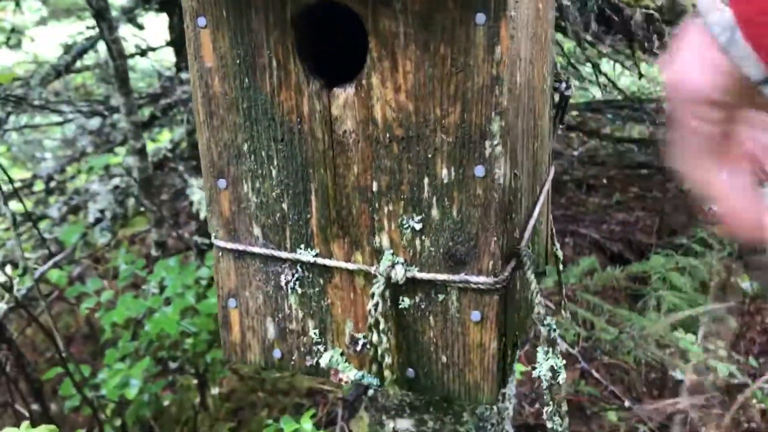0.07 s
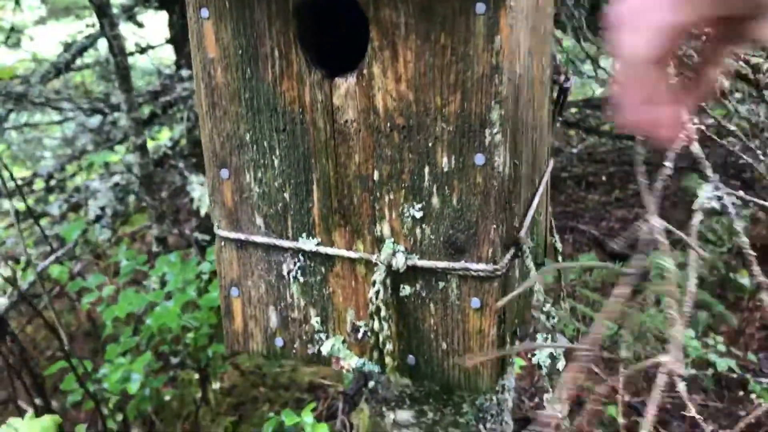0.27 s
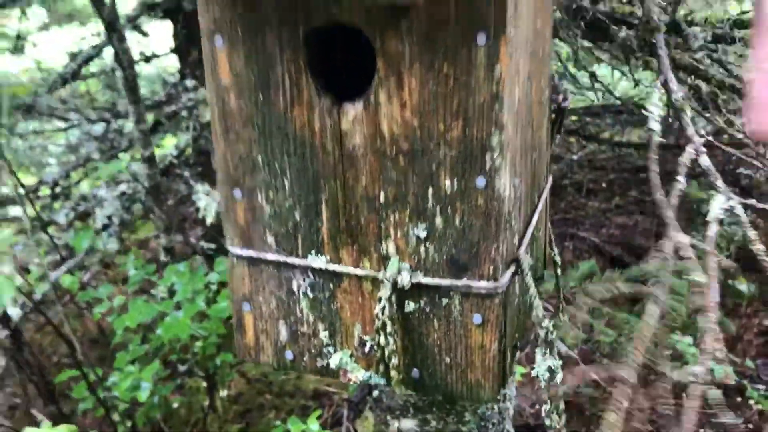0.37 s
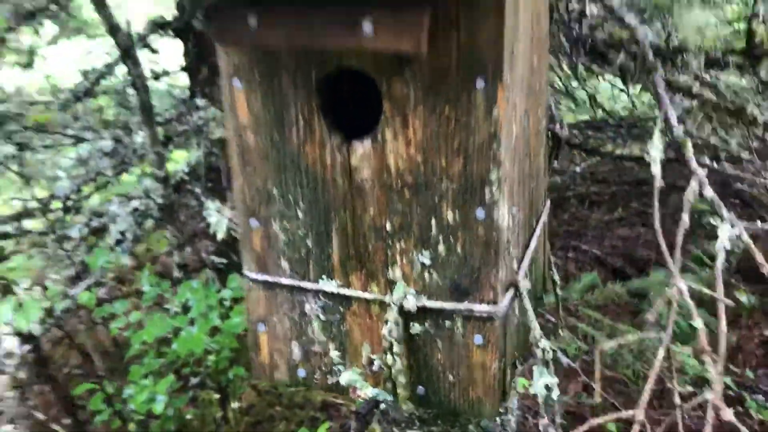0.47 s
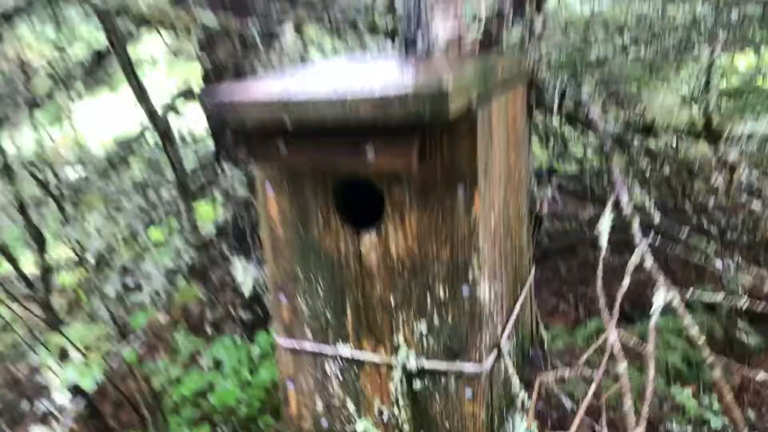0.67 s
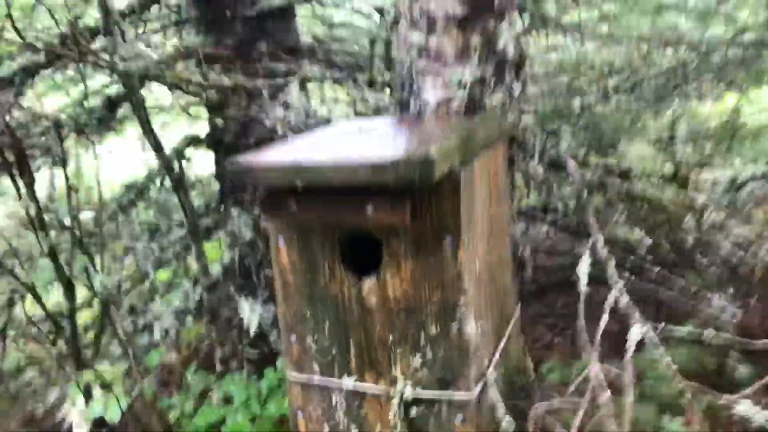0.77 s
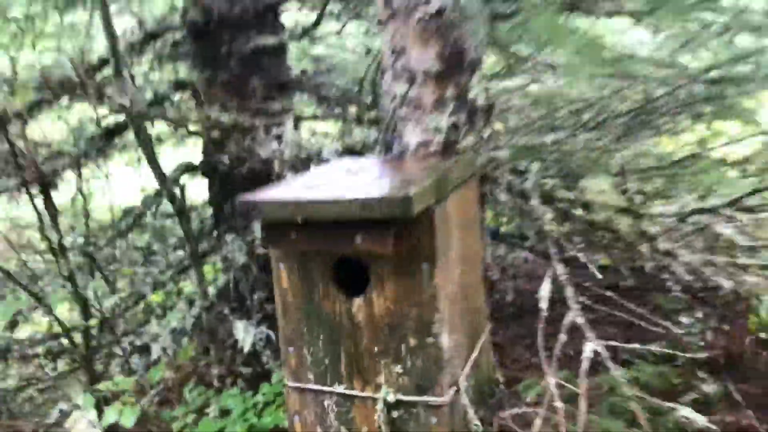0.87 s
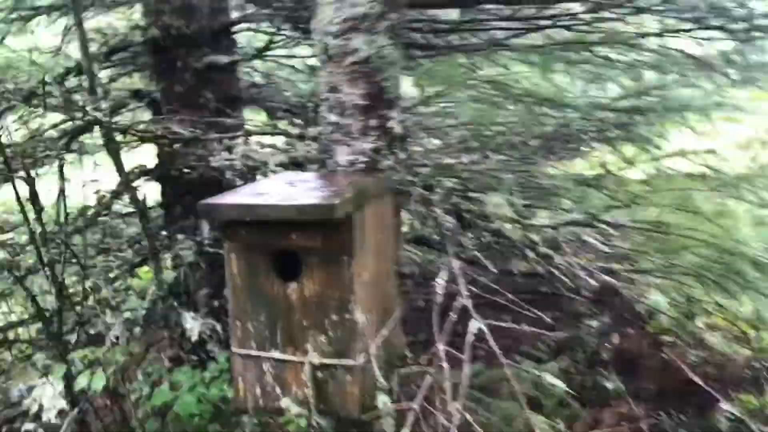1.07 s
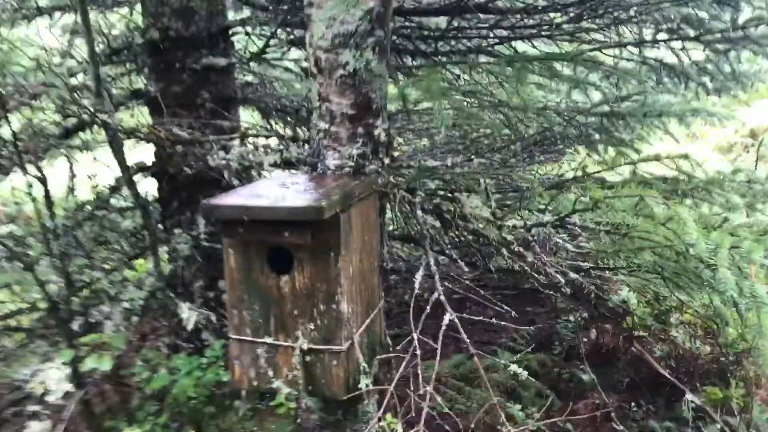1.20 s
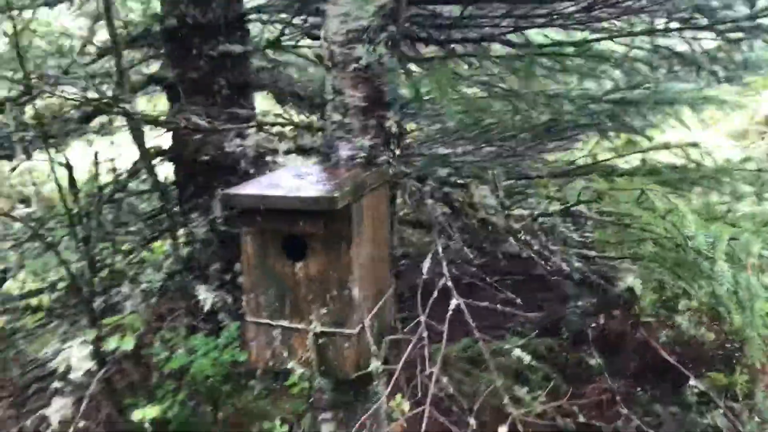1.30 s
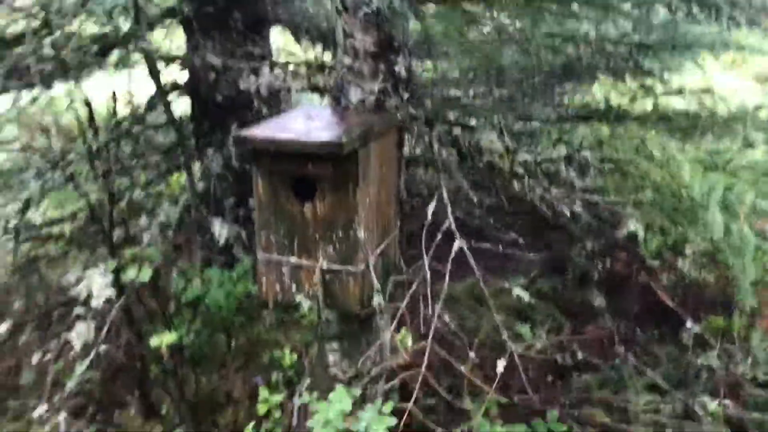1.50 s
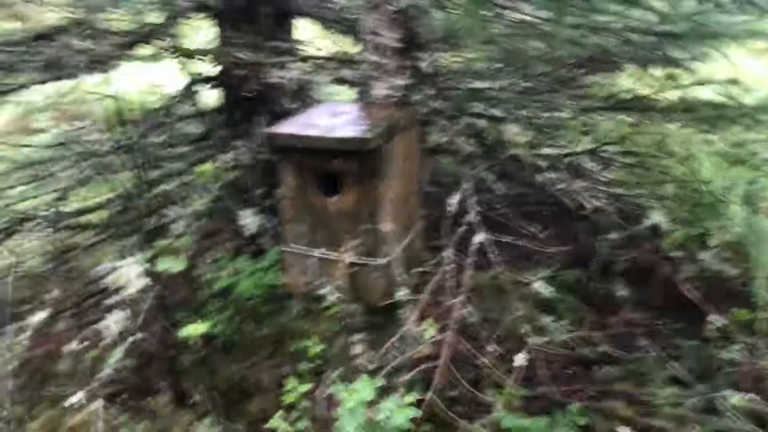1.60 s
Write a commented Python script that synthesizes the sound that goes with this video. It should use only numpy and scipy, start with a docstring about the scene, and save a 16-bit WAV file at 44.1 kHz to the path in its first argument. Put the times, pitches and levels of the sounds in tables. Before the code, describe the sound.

Knuckles knock on a hollow wooden nest box, then soft steps and twig snaps in woods

```python
"""Knocks on a wooden nest box

A hand knocks on a nest box in a quiet wood, lightly then firmly: damped modes clack and boom under a noise crack.
Then someone steps back over soft ground: low damped thuds, grainy rustles, noise-burst twigs, one pitched stick.
Thin whistles that rise and fall, probably a nylon sleeve sliding, are fuzzy gliding tones.
Shaped noise gives the faint air, hiss and rumble behind them."""
import sys
import numpy as np
from scipy import signal
from scipy.fft import rfft, irfft, next_fast_len
from scipy.io import wavfile
from scipy.ndimage import map_coordinates

SR = 44100
rng = np.random.default_rng(int(sys.argv[2]) if len(sys.argv) > 2 else 0)


def digitize_waveform(pressure):
    """Quantize a signal to 16-bit integers and store it at the path in sys.argv[1].

    Rows of a 2-D input are taken as channels; values are limited to [-1, 1].
    """
    field = np.atleast_2d(pressure).T
    bounded = np.clip(field, -1, 1)
    quanta = np.round(bounded * 32767).astype(np.int16)
    wavfile.write(sys.argv[1], SR, quanta)


N = 72765


def amp(db):
    """Decibels to linear amplitude."""
    return 10 ** (np.asarray(db) / 20)


def unit(x):
    """Scale to rms 1."""
    return x / np.sqrt(np.mean(x ** 2) + 1e-20)


def clock():
    """Time of each sample in seconds."""
    return np.arange(N) / SR


def filtered(x, gain):
    """x times a gain that depends on frequency in Hz."""
    size = next_fast_len(N + 8192)  # zero padding
    return irfft(rfft(x, size) * gain(np.fft.rfftfreq(size, 1 / SR)), size)[:N]


def noise(points):
    """Noise of rms 1 with a (Hz, dB) spectrum, interpolated over log frequency."""
    point_hz, point_db = np.transpose(points)

    def gain(hz):
        return amp(np.interp(np.log(hz + 1), np.log(point_hz + 1), point_db))
    return unit(filtered(rng.standard_normal(N), gain))


def band(centre_hz, octaves, skirt_db):
    """Noise of rms 1 in a bell around a centre, on a wide skirt."""
    def gain(hz):
        away = np.log2((hz + 1) / centre_hz) / octaves
        bell = np.exp(-.5 * away ** 2)
        skirt = amp(skirt_db) / np.sqrt(1 + (away / 2) ** 2)
        return bell + skirt
    return unit(filtered(rng.standard_normal(N), gain))


def wobble(knots_per_s):
    """A smooth random curve through normally distributed knots."""
    return map_coordinates(rng.standard_normal(N), [clock() * knots_per_s], mode="wrap")


def struck(start_s, t60_s, rise_s):
    """Envelope of a blow: quick rise, exponential decay."""
    t = np.maximum(clock() - start_s, 0)
    return (1 - np.exp(-t / rise_s)) * np.exp(-np.log(1000) * t / t60_s)


def ring(start_s, hz, t60_s, rise_s):
    """One damped mode, set going at start_s."""
    return struck(start_s, t60_s, rise_s) * np.sin(2 * np.pi * hz * (clock() - start_s))


def swell(peak_s, rise_s, fall_s):
    """A smooth hump with Gaussian sides."""
    t = clock() - peak_s
    return np.exp(-.5 * (t / np.where(t < 0, rise_s, fall_s)) ** 2)


def box():
    """The knuckle cracks, the boards ring, then the weight of the hand drives the wall and the hollow."""
    # knocks: start_s, level_db, crack_level_db
    knocks = [(-.001, -21.5, -59), (0.2127, 0, -34.5)]
    # hollow, walls, then boards: pitch_hz, level_db (added to the knock), t60_s, lag_s after first touch, rise_s
    modes = [(154, -6.5, 0.11, 0.00487, 0.009), (188.2, 1, 0.036, 0.00657, 0.0067),
             (240, -15.5, .041, 0.00666, 0.0018), (545, -20, 0.018, 0.00263, 0.00058),
             (755, -22.5, 0.0095, 0.00274, 0.00022), (989, -23.5, 0.018, 0.0004, 0.000091),
             (1350, -32, 0.02, 0.00035, .0002), (1850, -27, 0.0068, .00015, 0.00031),
             (2968, -37.5, 0.014, 0.00019, 0.00035), (3740, -30.5, .008, 0.0001, 0.00012)]
    # knuckle crack spectrum: freq_hz, level_db
    crack_spectrum = [(200, 9.5), (800, -6), (1700, 3.5), (2300, -10), (3800, 0), (5000, -5), (9000, -4.5),
                      (16000, -11)]
    crack_t60_s, crack_rise_s = 0.017, 0.00044
    radiation_hz = 75  # the small box gives off little below this

    out = np.zeros(N)
    for start_s, knock_db, crack_db in knocks:
        for hz, mode_db, t60_s, lag_s, rise_s in modes:
            out += amp(knock_db + mode_db) * ring(start_s + lag_s, hz, t60_s, rise_s)
        out += amp(crack_db) * struck(start_s, crack_t60_s, crack_rise_s) * noise(crack_spectrum)
    highpass = signal.butter(2, radiation_hz, "high", fs=SR, output="sos")
    return signal.sosfilt(highpass, out)


def footfalls():
    """Soft ground answers treads and bumps with a few low damped cycles."""
    # dull footfalls and bumps: start_s, level_db, pitch_hz, t60_s, rise_s
    thuds = [(0.6999, -25, 438, .007, 0.00058), (0.7016, -38, 127, 0.056, 0.0023),
             (0.7343, -38.5, 208, 0.02, 0.00077), (1.218, -47.5, 58, .09, 0.0036),
             (1.331, -42, 135, 0.038, .002), (1.338, -34, 54.8, .21, 0.025),
             (1.483, -42, 282, 0.032, 0.0013), (1.525, -44.5, 241, 0.045, 0.0016)]
    out = np.zeros(N)
    for start_s, level_db, hz, t60_s, rise_s in thuds:
        out += amp(level_db) * ring(start_s, hz, t60_s, rise_s)
    return out


def twigs():
    """Dry twigs break with a noise spike and a short crackle."""
    # snaps: start_s, level_db, centre_hz, t60_s
    snaps = [(0.668, -49, 8000, .005), (0.7009, -41.5, 4500, 0.0066), (.716, -39.5, 3200, 0.0072),
             (.9295, -46, 2200, 0.011), (.94, -43.5, 3000, 0.011), (1.038, -45, 3000, .008),
             (1.21, -45, 1090, 0.016), (1.608, -43.5, 3440, 0.026), (1.6317, -35, 9000, 0.0081),
             (1.6445, -39.5, 3440, 0.016)]
    width_octaves, skirt_db = 0.58, -6
    fracture_db, fracture_t60_s = 2.5, 0.001  # instant of breaking, relative to the crackle

    out = np.zeros(N)
    for start_s, level_db, hz, t60_s in snaps:
        crackle = struck(start_s, t60_s, rise_s=.0001)
        fracture = amp(fracture_db) * struck(start_s, fracture_t60_s, rise_s=.00005)
        out += amp(level_db) * (crackle + fracture) * band(hz, width_octaves, skirt_db)
    return out


def hollow_stick():
    """A hollow stick pops underfoot: a few short damped modes start together."""
    # modes: pitch_hz, level_db, t60_s
    stick_modes = [(1189, -17, 0.0088), (910, -32, 0.0088), (2650, -42.5, 0.01), (4340, -41, .007)]
    start_s, rise_s = 1.4833, .0012
    return sum(amp(level_db) * ring(start_s, hz, t60_s, rise_s) for hz, level_db, t60_s in stick_modes)


def undergrowth():
    """Each brush is a swell of tiny uneven grains."""
    # undergrowth brushed aside: peak_s, level_db, rise_s, fall_s, centre_hz
    rustles = [(.335, -62, .01, .012, 7000), (.435, -57.5, 0.01, .012, 550), (.527, -58, .006, 0.0071, 590),
               (.742, -64, .005, 0.0098, 497), (.82, -61, 0.036, 0.019, 347),
               (0.936, -50.5, 0.012, .007, 2300), (1.036, -51, 0.013, 0.021, 2180),
               (1.04, -55.5, 0.0056, 0.0057, 13000), (1.07, -58, 0.055, 0.04, 780),
               (1.133, -57, .018, 0.0093, 2900), (1.328, -58, 0.013, 0.036, 1880),
               (1.345, -60, 0.028, 0.047, 11000), (1.35, -60.5, 0.066, 0.046, 525),
               (1.575, -63, 0.024, 0.052, 1400), (1.62, -58, 0.0066, 0.025, 300),
               (1.642, -53.5, 0.018, .03, 4060)]
    width_octaves, skirt_db = 0.75, -14
    grain_depth_db, grain_knots_per_s = 4.5, 900

    out = np.zeros(N)
    for peak_s, level_db, rise_s, fall_s, hz in rustles:
        grain_gain = amp(grain_depth_db * wobble(grain_knots_per_s))
        grains = unit(grain_gain * band(hz, width_octaves, skirt_db))
        out += amp(level_db) * swell(peak_s, rise_s, fall_s) * grains
    return out


def sleeve():
    """Sliding cloth sings in narrow fuzzy lines whose pitch follows its speed."""
    # whistles: top_speed_s, top_pitch_hz, peak_s, level_db, spread_s
    swishes = [(.32, 4140, 0.31, -59.5, 0.012), (.515, 4510, 0.47, -51.5, 0.029),
               (1.278, 4540, 1.246, -56, 0.03)]
    # lines of the weave: pitch_ratio, level_db (added to the whistle), lag_s of the loudest moment
    weave = [(1, -3, 0.0075), (0.64, -15, 0.024), (1.44, -13, .045)]
    slowing_per_s2 = 38  # pitch falls away on either side of the top speed
    fuzz_knots_per_s = 160

    out = np.zeros(N)
    for top_s, top_hz, peak_s, swish_db, spread_s in swishes:
        pitch_hz = top_hz * np.exp(-slowing_per_s2 * (clock() - top_s) ** 2)
        turns = np.cumsum(pitch_hz) / SR
        for ratio, line_db, lag_s in weave:
            fuzz = 1 + .5 * (wobble(fuzz_knots_per_s) + 1j * wobble(fuzz_knots_per_s))
            line = unit(np.real(fuzz * np.exp(2j * np.pi * ratio * turns)))
            out += amp(swish_db + line_db) * swell(peak_s + lag_s, spread_s, spread_s) * line
    return out


def trees(x):
    """A weak, short scatter from trunks and branches; longer waves pass round them."""
    t60_s, scatter_hz, level_db = .18, 350, -29
    tail = filtered(rng.standard_normal(N), lambda hz: hz ** 2 / (hz ** 2 + scatter_hz ** 2))
    tail *= struck(0, t60_s, rise_s=0.0044)
    return amp(level_db) * signal.fftconvolve(x, tail / np.linalg.norm(tail))[:N]


def background():
    """Forest air, a fine hiss and the low rumble of the moving microphone, as shaped noises."""
    # background course: time_s, air_level_db, hiss_level_db
    levels = [(0, -61, -58), (.2, -61, -57), (.5, -60, -56.5), (.75, -63, -59), (.9, -61, -59),
              (1.1, -59, -58.5), (1.36, -63, -59), (1.43, -64, -63), (1.65, -59.5, -61)]
    # rumble course: time_s, level_db
    rumble_levels = [(0, -70.5), (.75, -70), (.9, -60.5), (1.25, -62), (1.65, -61)]
    # air spectrum: freq_hz, level_db
    air_spectrum = [(15, -31), (25, -3), (66, -3.5), (108, -8), (185, -2.5), (262, -4.5), (364, -4),
                    (450, -10.5), (546, -7), (612, -12), (1110, -4.5), (1600, -12.5), (2500, -15),
                    (3250, -40), (5500, -120)]
    # hiss spectrum: freq_hz, level_db
    hiss_spectrum = [(1180, -35), (2000, -13), (2260, -5.5), (2440, -0.5), (2750, -4), (3570, 2.5),
                     (4170, 1.5), (4590, -2), (5550, -2), (6370, -2.5), (8550, -2), (10300, -5.5),
                     (12600, -2.5), (15100, -3.5), (15800, -4)]
    # rumble spectrum: freq_hz, level_db
    rumble_spectrum = [(20, -16), (50, -1), (95, -5.5), (200, -15.5), (600, -62)]

    time_s, air_db, hiss_db = np.transpose(levels)
    rumble_time_s, rumble_db = np.transpose(rumble_levels)
    air = amp(np.interp(clock(), time_s, air_db)) * noise(air_spectrum)
    hiss = amp(np.interp(clock(), time_s, hiss_db)) * noise(hiss_spectrum)
    rumble = amp(np.interp(clock(), rumble_time_s, rumble_db)) * noise(rumble_spectrum)
    return air + hiss + rumble


def scene():
    """All sources, close to one microphone; the trees scatter all but the background."""
    near = box() + footfalls() + twigs() + hollow_stick() + undergrowth() + sleeve()
    return (near + trees(near) + background())[None]


def record(dry):
    """Nothing is kept above the band limit."""
    top_hz = 15950
    return np.array([filtered(x, lambda hz: hz < top_hz) for x in dry])


dry = scene()
out = record(dry)
digitize_waveform(out)
```